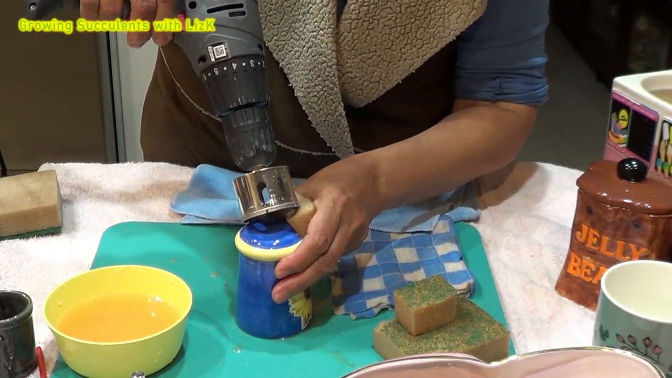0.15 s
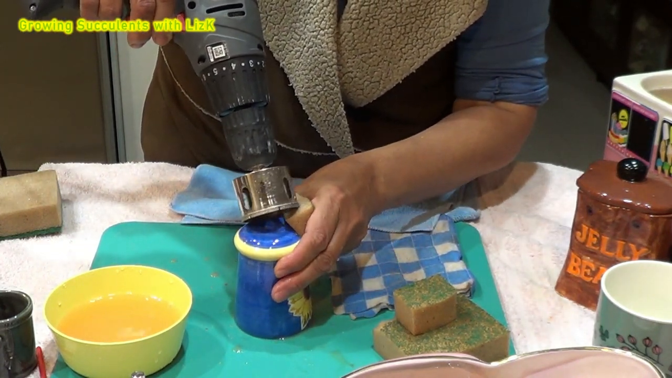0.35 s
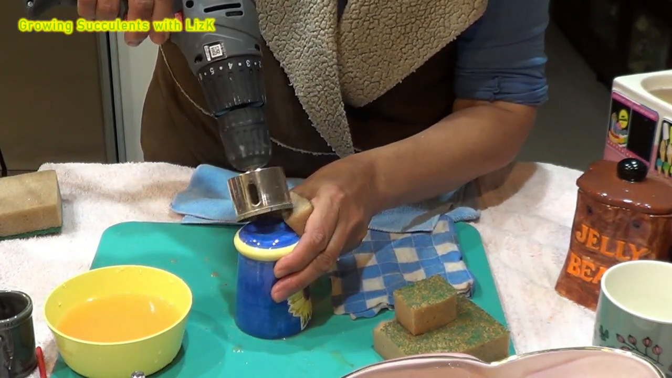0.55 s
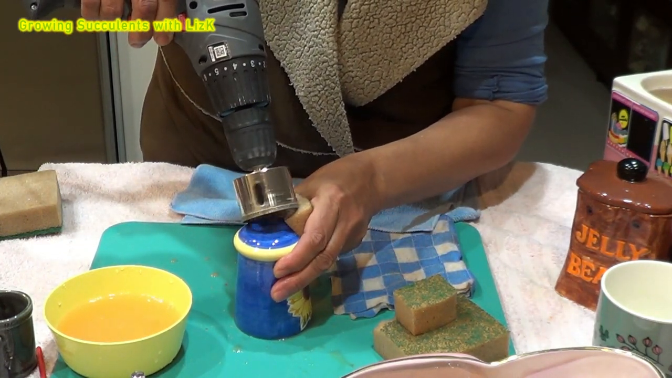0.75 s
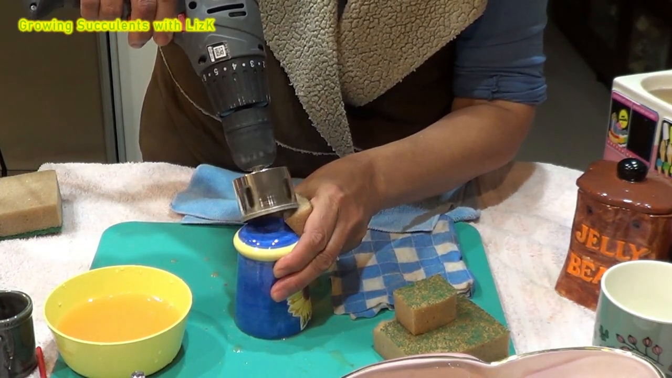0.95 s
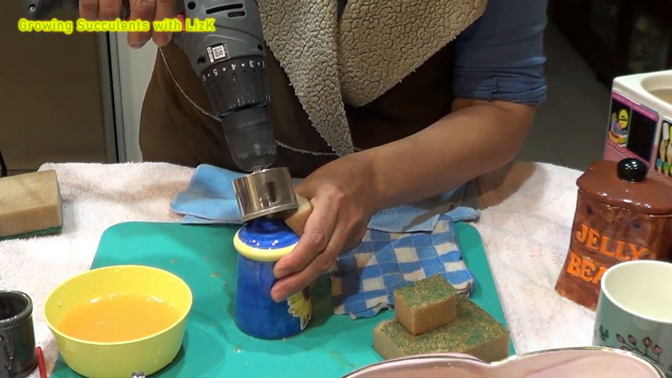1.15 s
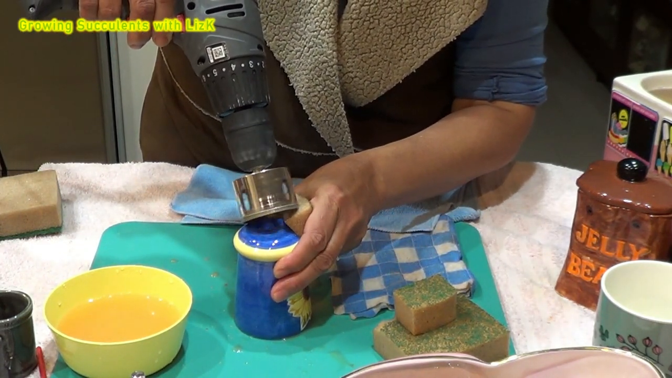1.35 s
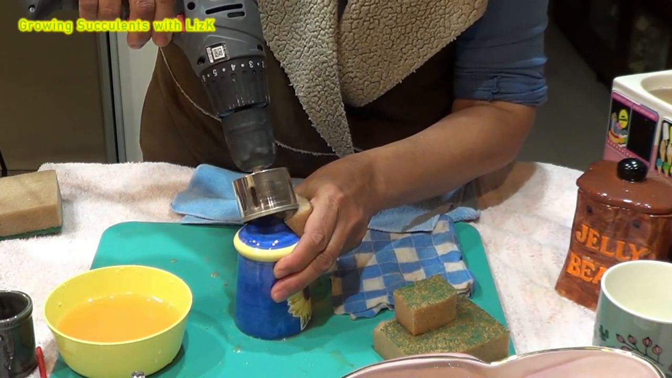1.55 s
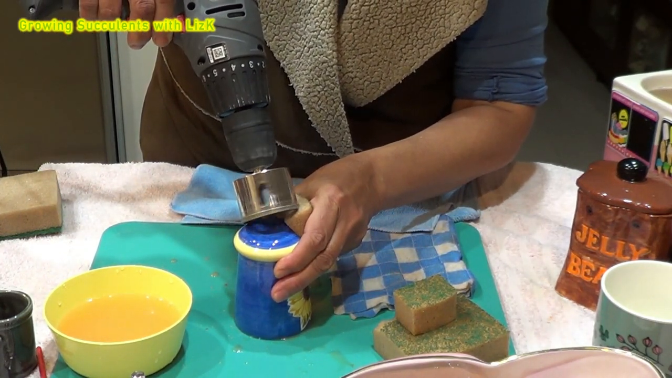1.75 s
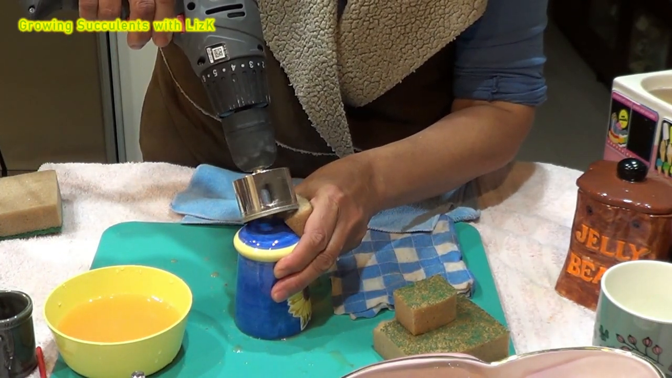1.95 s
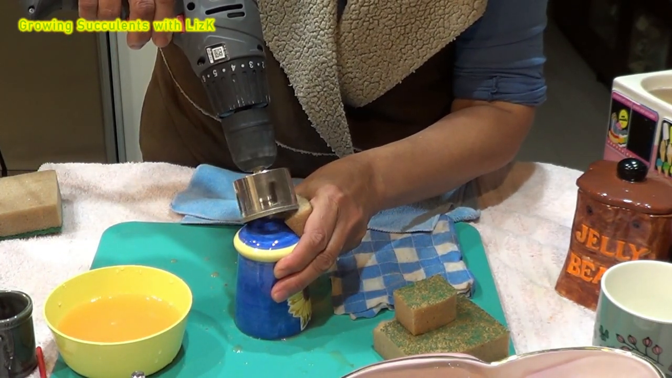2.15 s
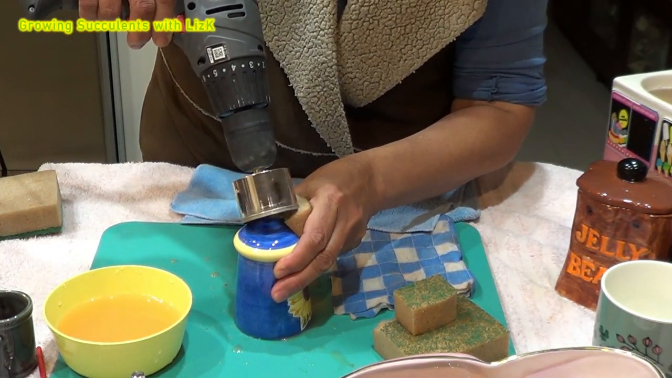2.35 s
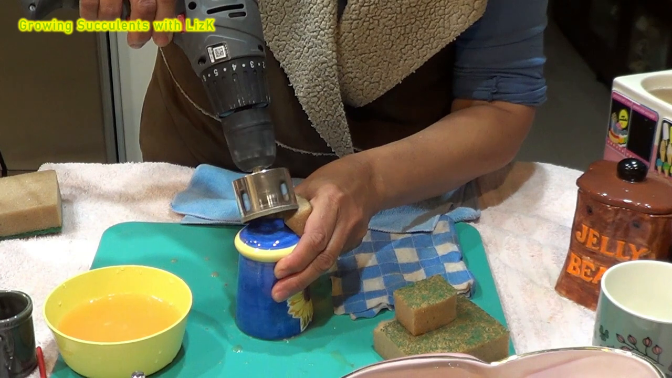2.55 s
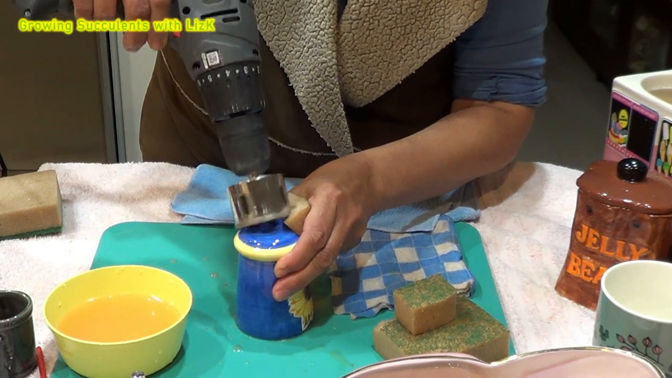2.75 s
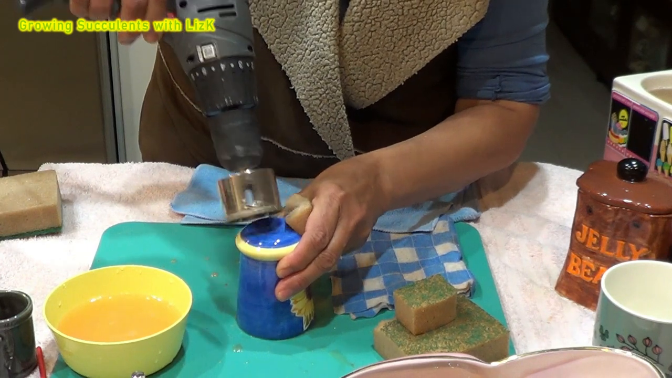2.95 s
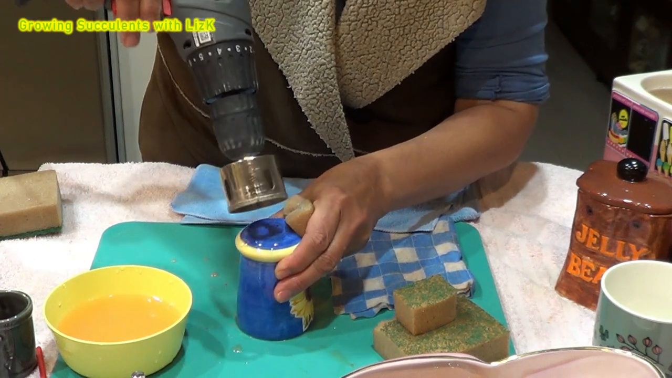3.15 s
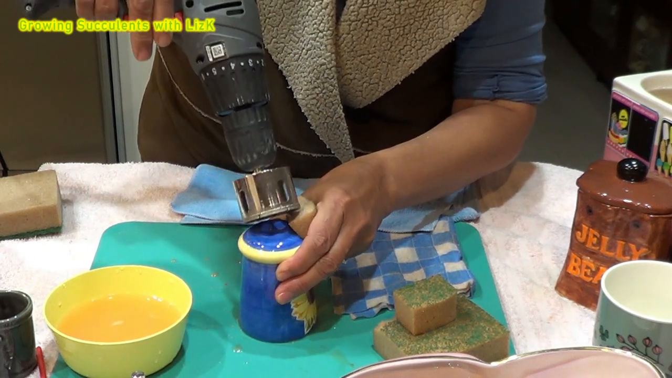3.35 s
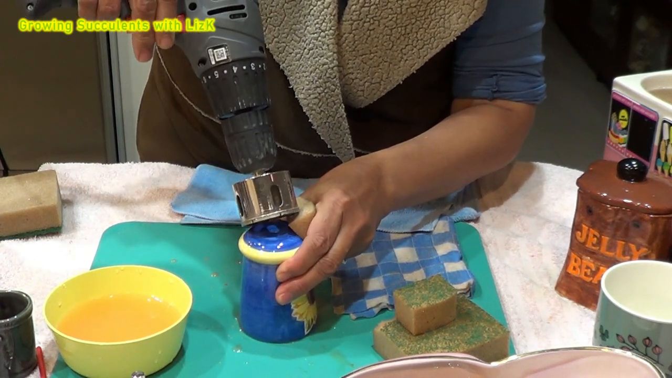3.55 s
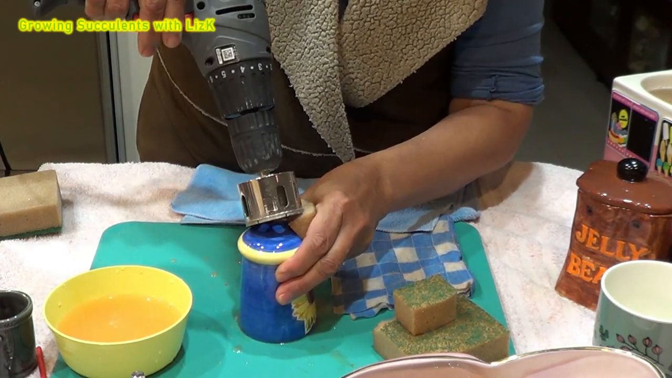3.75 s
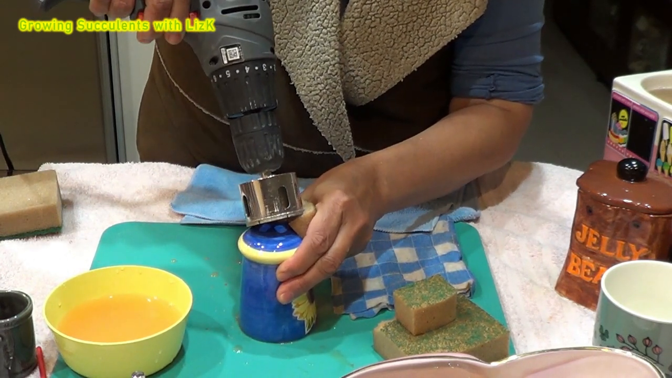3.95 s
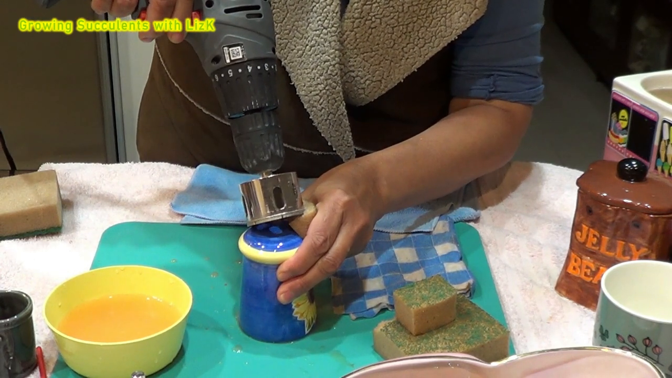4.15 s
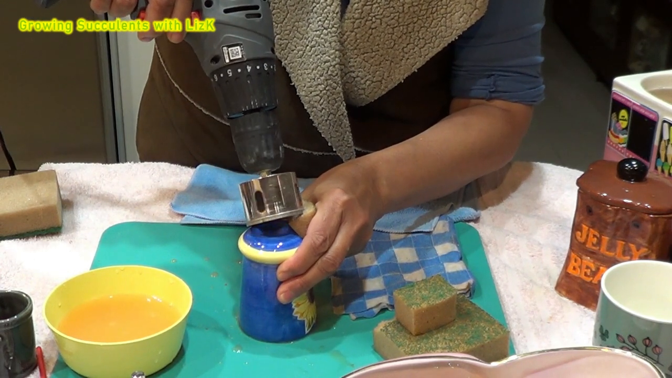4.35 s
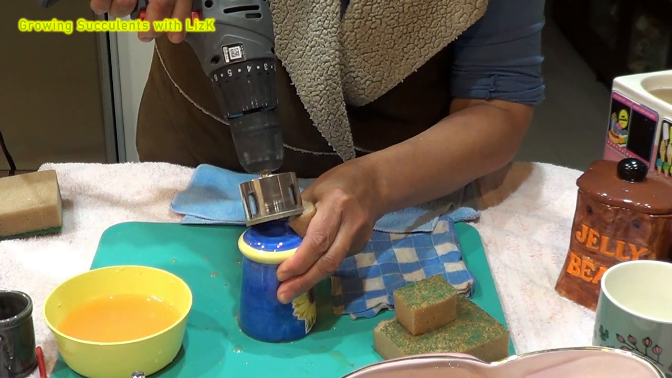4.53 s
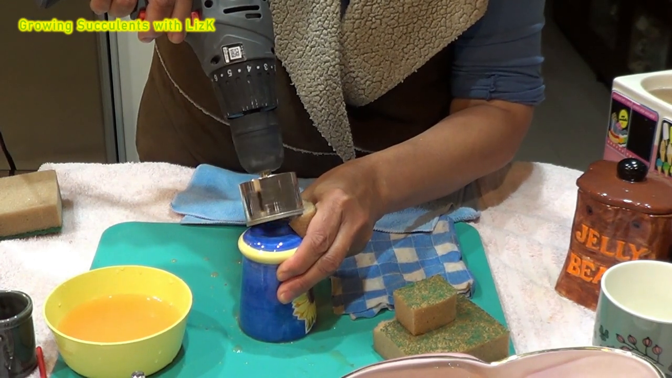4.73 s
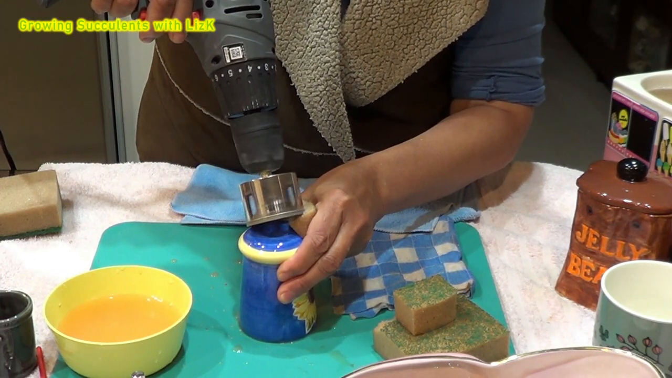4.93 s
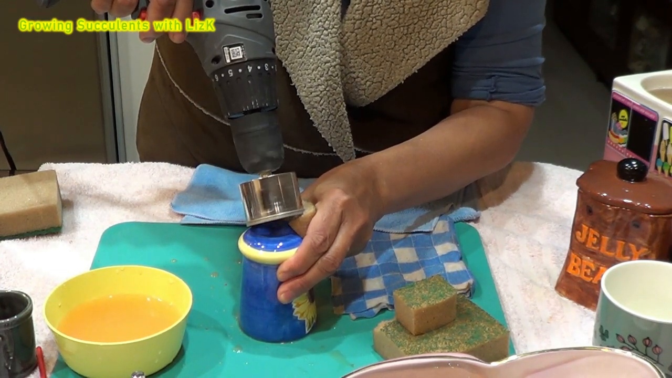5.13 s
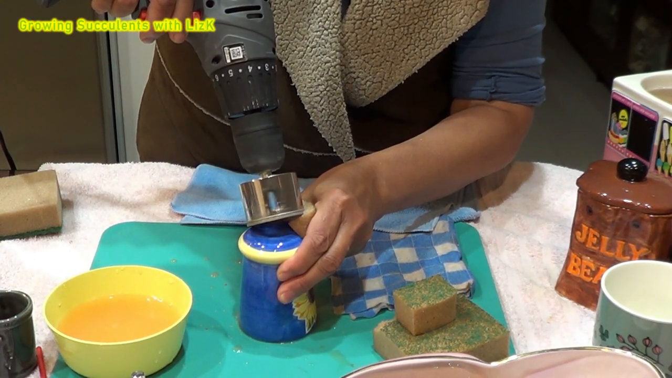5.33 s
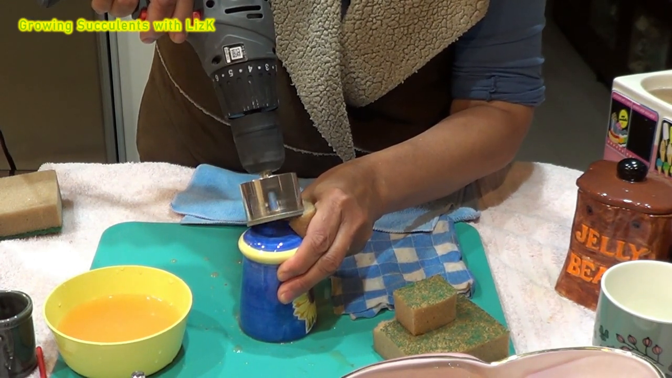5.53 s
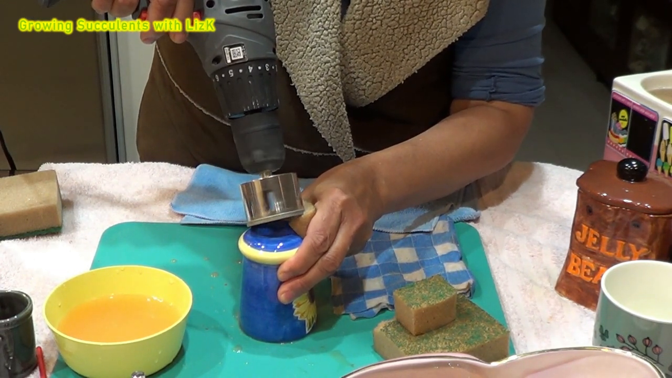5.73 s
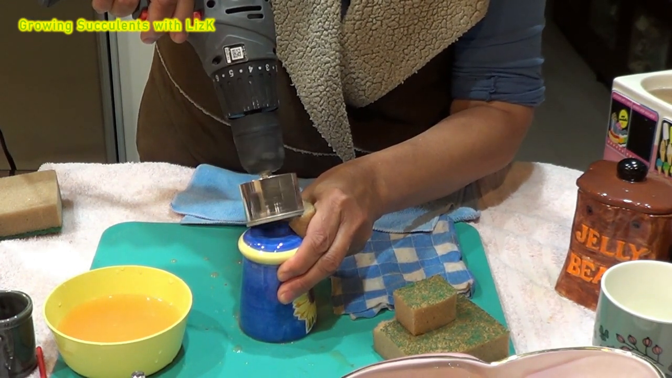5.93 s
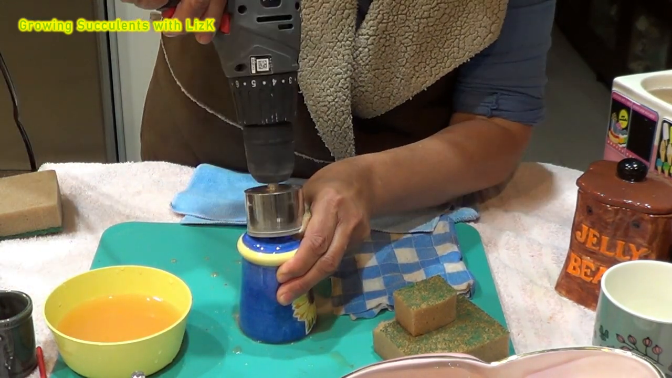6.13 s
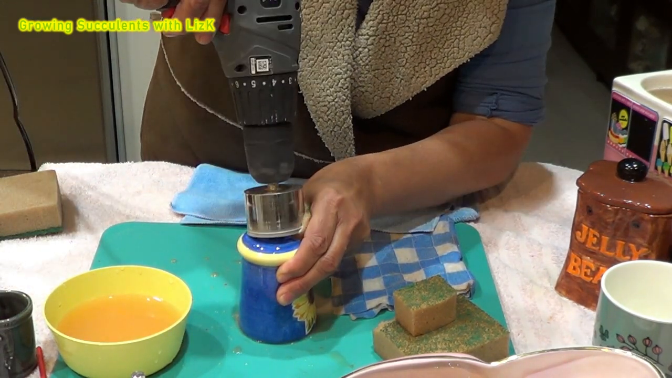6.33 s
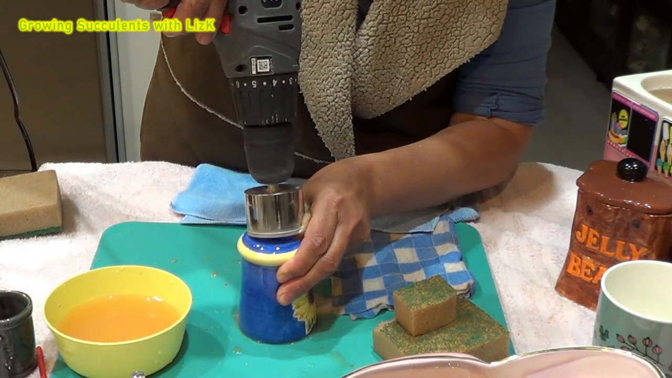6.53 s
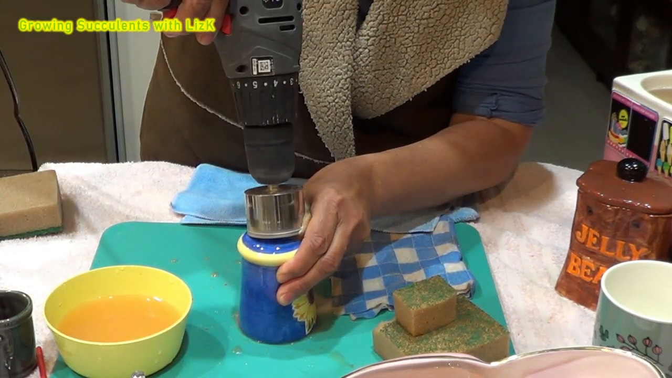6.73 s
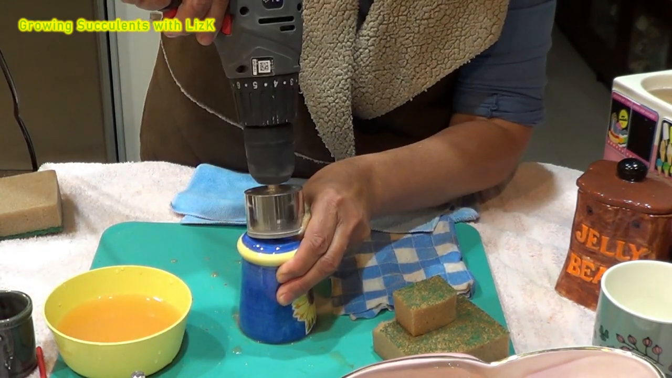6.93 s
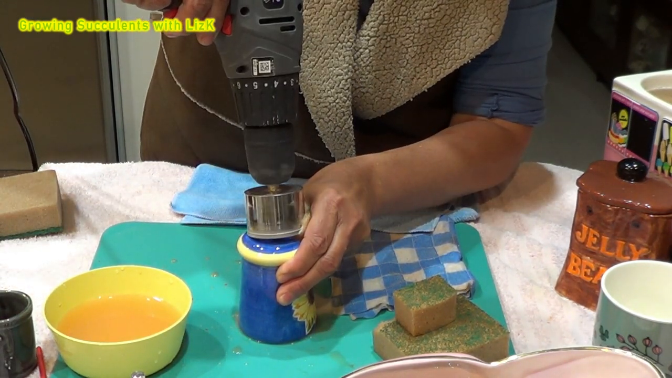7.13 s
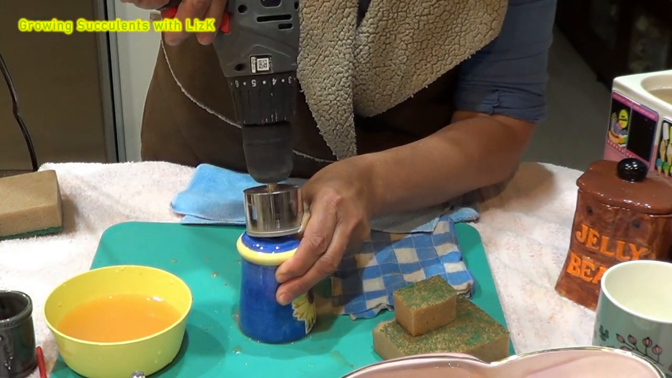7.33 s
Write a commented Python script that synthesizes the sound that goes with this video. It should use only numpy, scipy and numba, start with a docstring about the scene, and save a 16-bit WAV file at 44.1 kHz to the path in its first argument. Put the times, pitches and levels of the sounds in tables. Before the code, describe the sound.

A small room with a low steady noise floor and the microphone close. Small clicks and slow gear ticks at 0.1 to 0.3 seconds quicken into a rough drill whir, climbing to a medium whine by about 1 second. Gritty, uneven grinding rumbles in the hollow ceramic pot, strongest near 0.75, with steel ringing and hiss. The pitch holds, sags from about 2.3, dips near 2.8, briefly revives, then falls quickly from 3.1 to a stop by about 3.45. Dull knocks as the saw is set down come at 3.4 to 3.7. Light rattles and hesitant ticking from 3.8 to 4.2 lead into a rapid climb, reaching a high, bright whine around 5 seconds. Near 6 it drops slightly and becomes cleaner, pulsing gently over lighter grit, sagging a little just before the end at about 7.4, still running.

```python
"""In a small room, a cordless drill turns a diamond hole saw on a wet ceramic pot, close to the listener.
Gear teeth tap the housing, slowly at first and then as a whine: each tap excites damped resonances.
Random grains of grit rumble in the hollow pot, ring the steel saw and hiss.
The drill runs down, the saw is set back on the pot with a few knocks, and a faster run follows.
A diffuse tail and a steady noise floor surround it; the two channels differ slightly."""
import sys
import numpy as np
from scipy import signal
from scipy.fft import rfft, irfft, next_fast_len
from scipy.io import wavfile
from scipy.ndimage import uniform_filter1d
from numba import njit

SR = 44100
rng = np.random.default_rng(int(sys.argv[2]) if len(sys.argv) > 2 else 0)


def transcribe(u):
    """Save the signal u as a 16-bit wav file named by the first command-line argument.

    u: samples, shape (n,) or (channels, n), limited to [-1, 1]; the rate is SR.
    q: integer samples, one column per channel.
    """
    v = np.clip(np.atleast_2d(u).T, -1, 1)
    q = np.round(v * 32767).astype(np.int16)
    wavfile.write(sys.argv[1], SR, q)


N = 325590  # length in samples

# Steady background noise. Each row: frequency in Hz, relative spectral density in dB.
FLOOR_SPECTRUM = [(20, -22), (60, -24), (190, -9.5), (260, -12), (400, -9), (750, -2.5), (1500, -9.5),
                  (4000, -8.5), (8000, -19), (15500, -30)]
FLOOR_DB = -46.5  # RMS level
# Left-right balance. Each row: frequency in Hz, left minus right in dB.
BALANCE = [(100, 1), (600, .5), (2500, 1.6), (5000, 1.3), (9000, .2), (15000, 0)]
# Part unlike in the two channels. Each row: frequency in Hz, gain in dB before a common trim.
SIDE_SPECTRUM = [(30, -23), (120, -1), (300, -10), (700, -13), (1300, -17.5), (2400, -16.5), (4400, -5),
                 (6500, -8), (9000, -17), (13000, -54)]
ROOM_DB = -13  # gain of the diffuse tail
TOP_HZ = 15720  # upper band limit

# Resonances of the loose parts of the housing. Each row: frequency in Hz, width in Hz, relative gain in dB.
HOUSING_MODES = [(960, 226, -8.5), (1694, 556, -5), (2577, 665, -0.5), (3420, 620, -1), (4156, 890, -2.5),
                 (5390, 530, -3), (6380, 1450, -11.5), (6940, 270, -9), (8430, 2500, -13),
                 (11100, 7600, -19)]
# Resonances of the hollow pot. Each row: frequency in Hz, width in Hz, relative gain in dB.
POT_MODES = [(266, 45, -22.5), (414.8, 16.5, 0.5), (536, 77, 1), (650, 93, 1.5), (731, 50, 5),
             (1000, 520, -7)]
# Resonances of the glazed rim of the pot. Each row: frequency in Hz, width in Hz, relative gain in dB.
RIM_MODES = [(2450, 50, 2), (4450, 300, -1)]
# Resonances of the steel saw. Each row: frequency in Hz, width in Hz, relative gain in dB.
SAW_MODES = [(6800, 300, -4), (7250, 200, -3), (8120, 250, -9), (10250, 150, 1), (12200, 80, -10),
             (12800, 90, -8), (13250, 70, -9), (13500, 60, -9), (14100, 170, -12)]
# Resonances of the gearbox. Each row: frequency in Hz, width in Hz, relative gain in dB.
GEARBOX_MODES = [(1296, 135, 1), (1582, 268, 6.5), (1882, 133, 6.5), (2058, 111, 7), (2261, 580, 7),
                 (2760, 480, 5.5), (3046, 73, 4), (3564, 284, 2), (4480, 560, -8), (4350, 82, 2),
                 (5156, 330, -5), (6020, 170, -5), (7120, 860, -14.5)]
# Table shaking under the pot. Each row: frequency in Hz, relative spectral density in dB.
TABLE_SHAKE = [(20, -32), (120, -33.5), (200, -25), (330, -13.5), (420, -30), (800, -90)]

# Short clicks of housing and steel: some loose rattles, some accenting the first slow gear ticks.
# Each row: time in seconds, relative housing blow in dB, relative steel blow in dB.
CLICK_BLOWS = [(0.0147, -23, -38), (.137, -26, -24.5), (0.163, -22, -20), (0.212, -22, -18),
               (0.286, -23, -16), (0.517, -27, -16.5), (.705, -10, -26), (3.574, -21, -29.5),
               (3.824, -41, -36), (3.85, -28, -36), (3.914, -16, -39), (3.954, -18.5, -31),
               (3.98, -33, -36), (4.036, -21, -33), (4.064, -20, -24), (4.097, -14.5, -33),
               (4.123, -15, -24)]
CLICK_POT_DB, CLICK_RIM_DB = -27, -32  # relative to the housing blow
# Saw set down on the pot. Each row: time in seconds, relative thump in dB, relative hard edge in dB.
SET_DOWN_BLOWS = [(3.393, -21.5, -46), (3.585, -34, -32), (3.601, -23, -27), (3.622, -22.5, -44),
                  (3.676, -34, -54)]
# Blows relative to the hard edge. One row: housing in dB, steel in dB, rim in dB.
EDGE_OFFSETS = (10, -6, -2)

# Pull of the motor, one list per stretch of running. Each row: time in seconds,
# tooth rate in Hz that the motor pulls towards (below zero it brakes).
MOTOR_PULL = [
    [(.085, 700), (.105, 206), (.22, 437), (.833, 633), (1.493, 687), (2.1, 643), (2.33, 618), (2.5, 530),
     (2.739, 515), (2.798, 167), (2.833, 632), (2.957, 690), (3.077, 530), (3.126, -429), (3.45, -585)],
    [(3.965, 130), (4.07, 300), (4.14, 140), (4.189, 235), (4.352, 1088), (5.2, 1139), (5.81, 1144),
     (5.98, 1087)],
    [(5.981, 990), (6.25, 1030), (6.6, 1040), (6.95, 985), (7.2, 1015), (7.26, 1000), (7.3, 760),
     (7.38, 760)],
]
# Speed as each stretch begins. One row: tooth rate in Hz per stretch.
START_RATES = [40, 33, 995]
INERTIA_S = .53  # time constant of the tooth rate

# Swell once a saw turn. One row: depth (0-1) per stretch.
SAW_WOBBLE = [0, .2, .6]
TEETH, TEETH_A_SAW_TURN = 15, 272  # teeth passing per turn of pinion and of saw
# Pinion position as each stretch begins. One row: turns per stretch.
PINION_START = [.28, .12, 0]
PINION_SWELL = 0.23  # swell once a pinion turn (0-1)
LABOUR_SWELL, LABOUR_HZ = 0.15, 350  # added swell when pulling, deepest near this tooth rate
TAP_JITTER, JITTER_HZ = .006, 600  # share of a tooth period at this rate; slower teeth stray more

# Base levels before speed and weight act. Each row, one per stretch: gears in dB, pot rumble in dB, saw ring in dB.
STRETCH_LEVELS = [(-12, -22.5, -17.5), (-12, -23, -20), (-10.5, -26.5, -23)]
# Loss at low speed, for gears, pot and saw. Each row: knee in Hz, loss in dB per halving of rate far below it.
SPEED_KNEES = [(239, 11), (183, 11.5), (730, 7.5)]
# Weight of the saw on the pot. Each row: time in seconds, weight in dB.
WEIGHT = [(.2, -1), (.35, 0), (.75, 3.5), (1.5, -0.5), (2.6, 0), (2.85, -4.5), (3.12, -55.5), (3.45, 14.5),
          (3.95, 4), (4.5, 1.5), (4.7, -2), (7.38, -3)]
GEAR_SHARE, SAW_SHARE = 0.12, 0.01  # share of the weight's dB that gears and saw follow
# Base of clean taps over rattle. One row: ratio in dB per stretch, before speed, effort and weight act.
CLEAN_BASE = [.5, 1.5, 5]
# Taps are cleanest under a light load. Each row: weight in dB, added clean-to-rattle ratio in dB.
CLEAN_FOR_WEIGHT = [(-25, -5), (-3, 1), (3, -3.5)]
SLOW_CLEAN_DB, SLOW_HZ = 3.5, 130  # lone slow taps stand clear of the rattle
EFFORT_CLEAN_DB, EFFORT_GEAR_DB = 6, 2.5  # per 1000 Hz of pull above the tooth rate
BRAKE_GEAR_DB = 2  # per 1000 Hz of pull below the tooth rate
FADE_S = .04  # averaging time of the levels at start and stop


def undb(db):
    """Decibel law: amplitude ratio of a level."""
    return 10 ** (np.asarray(db) / 20)


def level(x, db):
    """Root-mean-square law: scale a signal to an RMS level in dB."""
    return x * undb(db) / np.sqrt(np.mean(x ** 2))


@njit
def svf(x, hz, width):
    """Damped resonance: a state-variable band-pass with gain 1 at the centre."""
    y, band, low = np.empty(len(x)), 0., 0.
    g, damping = np.tan(np.pi * hz / SR), width / hz
    for i in range(len(x)):
        v = (band + g * (x[i] - low)) / (1 + g * (g + damping))
        band = 2 * v - band
        low += 2 * g * v
        y[i] = damping * v
    return y


def ring(x, modes):
    """Modal superposition: a body is a sum of resonances, here with alternating signs."""
    out = 0
    for k, (hz, width, db) in enumerate(modes):
        # the tiny offset keeps silence away from denormal numbers
        out = out + (-1) ** k * undb(db) * svf(x + 1e-18, 1. * hz, 1. * width)
    return out


def colour(x, table):
    """Linear filtering: gain in dB interpolated over log frequency."""
    hz, db = np.transpose(table)
    size = next_fast_len(N)
    log_hz = np.log(np.fft.rfftfreq(size, 1 / SR) + 1)
    gain = undb(np.interp(log_hz, np.log(hz + 1), db))
    return irfft(rfft(x, size) * gain, size)[:N]


def walk(rate):
    """Random modulation: levels held 1 / rate seconds and slewed twice, with a spread near 1."""
    hold = int(SR / rate)
    steps = np.repeat(rng.standard_normal(N // hold + 1), hold)
    return 1.3 * uniform_filter1d(uniform_filter1d(steps, hold), hold)[:N]


def taps(at, size):
    """Impulsive excitation: clicks at fractional sample places, shared between neighbours."""
    out, i = np.zeros(N + 2), np.clip(at, 0, N).astype(int)
    np.add.at(out, i, size * (1 - at + i))
    np.add.at(out, i + 1, size * (at - i))
    return out[:N]


def grit(share, spread_db):
    """Random impulses: grains crack by chance, a few far larger than the rest."""
    chance, rarity = rng.random((2, N))
    sign = np.sign(chance * 1e6 % 1 - .5)
    return np.where(chance < share, sign * undb(-spread_db * np.log(rarity + .002)), 0)


def background():
    """Stationary noise: a steady floor with a fixed spectrum."""
    return level(colour(rng.standard_normal(N), FLOOR_SPECTRUM), FLOOR_DB)


def room(x, t60_s):
    """Diffuse decay: convolution with fading noise whose treble dies in half the time."""
    t = np.arange(SR // 2) / SR
    noise = rng.standard_normal(len(t))
    dull = svf(noise, 650., 1500.)
    tail = dull * undb(-60 * t / t60_s)
    tail += (noise - dull) * undb(-60 * t / (t60_s / 2))
    return signal.fftconvolve(x, level(tail, 0) / np.sqrt(len(t)))[:N]


def knocks():
    """Impact excitation: each click or knock is a short rough push that rings housing, pot, saw and rim."""
    click_s, housing, steel = np.transpose(CLICK_BLOWS)
    down_s, thump, edge = np.transpose(SET_DOWN_BLOWS)
    click_db = [housing, housing + CLICK_POT_DB, steel, housing + CLICK_RIM_DB]
    down_db = [edge + EDGE_OFFSETS[0], thump, edge + EDGE_OFFSETS[1], edge + EDGE_OFFSETS[2]]
    blows_db = np.hstack([click_db, down_db])
    at, out = np.r_[click_s, down_s] * SR, 0
    # modes, gain in dB, decay of the push in seconds, steady part of the push
    bodies = [(HOUSING_MODES, 3.3, 0.0049, 0), (POT_MODES, 24.4, 0.0025, 1),
              (SAW_MODES, 21.6, 0.0016, 0), (RIM_MODES, 26.0, 0.0047, 0)]
    for db, (modes, gain_db, contact_s, push) in zip(blows_db, bodies):
        fade = np.exp(-np.arange(900) / (contact_s * SR))
        blow = np.convolve(taps(at, undb(db)), fade)[:N] * (push + rng.standard_normal(N))
        out = out + undb(gain_db) * ring(blow, modes)
    return out


def pot():
    """Cavity resonance: grit thumps the hollow pot in uneven bursts; the table shakes a little."""
    thumps = grit(0.016, 2.07) * undb(1.75 * walk(45))
    rumble = svf(ring(thumps, POT_MODES), 477.0, 860.0)
    shake = colour(rng.standard_normal(N), TABLE_SHAKE)
    return level(rumble, 0) + level(shake, -23.5)


def saw():
    """Shell vibration: sharp grains ring the steel cup and hiss; its highest modes speak in own bursts."""
    grains = grit(.05, 3.2) * undb(2.3 * walk(14))
    bursts = grains * undb(4.5 * walk(9))
    hiss = svf(grit(0.18, 3.6) * undb(1.4 * walk(10)), 6930.0, 4800.0)
    steel = ring(grains, SAW_MODES[:4]) + ring(level(bursts, 0) * grains.std(), SAW_MODES[4:])
    return level(steel, -2) + level(hiss, -4)


def motor():
    """Rotational inertia: the tooth rate lags the pull; returns rate, pull and samples of each stretch."""
    t, spans = np.arange(N) / SR, []
    hz, pull = np.full(N, 30.), np.full(N, 30.)
    keep = np.exp(-1 / (INERTIA_S * SR))
    for run, start_hz in zip(MOTOR_PULL, START_RATES):
        s, target_hz = np.transpose(run)
        on = np.flatnonzero((t >= s[0]) & (t <= s[-1]))
        pull[on] = np.interp(t[on], s, target_hz)
        hz[on] = signal.lfilter([1 - keep], [1, -keep], pull[on], zi=[keep * start_hz])[0]
        spans.append(on)
    return hz, pull, spans


def levels(hz, pull, spans):
    """Load dependence: gains and clean-to-rattle ratio follow speed, effort, braking and weight on the pot."""
    db, running = np.zeros((4, N)), np.zeros(N)
    for on, row, clean in zip(spans, STRETCH_LEVELS, CLEAN_BASE):
        db[:, on] = np.r_[row, clean][:, None]
        running[on] = 1
    brake, effort = np.clip([hz - pull, pull - hz], 0, None) / 1000
    weight_db = np.interp(np.arange(N) / SR, *np.transpose(WEIGHT))
    for k, ((knee_hz, halving_db), share) in enumerate(zip(SPEED_KNEES, (GEAR_SHARE, 1, SAW_SHARE))):
        db[k] += share * weight_db - halving_db * np.log2(1 + (knee_hz / hz) ** 2) / 2
    db[0] += BRAKE_GEAR_DB * brake + EFFORT_GEAR_DB * effort
    clean_db = db[3] + SLOW_CLEAN_DB / (1 + (hz / SLOW_HZ) ** 2) + EFFORT_CLEAN_DB * effort
    clean_db += np.interp(weight_db, *np.transpose(CLEAN_FOR_WEIGHT))
    gains = uniform_filter1d(undb(db[:3]) * running, int(FADE_S * SR), mode="nearest")
    return gains, clean_db


def gears(hz, pull, spans, clean_db):
    """Gear meshing: one tap per tooth, swelled and shifted by an off-centre pinion; loose play rattles after."""
    places, turns, swell = [], [], np.ones(N)
    for on, depth, start in zip(spans, SAW_WOBBLE, PINION_START):
        teeth = np.cumsum(hz[on]) / SR
        k = np.arange(int(teeth[-1]) + 1)
        places.append(np.interp(k - .035 * np.sin(2 * np.pi * k / TEETH), teeth, on))
        turns.append(k / TEETH + start)
        swell[on] = 1 + depth * np.cos(2 * np.pi * (teeth / TEETH_A_SAW_TURN - .25))
    at = np.concatenate(places)
    turn = 2 * np.pi * np.concatenate(turns)
    size_chance, time_chance = rng.standard_normal((2, len(at)))
    rate = hz[at.astype(int)]
    labour = np.exp(-2 * np.log(rate / LABOUR_HZ) ** 2) * (pull[at.astype(int)] > rate)
    depth = np.clip(PINION_SWELL + LABOUR_SWELL * labour, 0, 1)
    size = (1 + depth * np.cos(turn)) * undb(2.74 * size_chance)
    stray = TAP_JITTER * (JITTER_HZ / rate) ** .75 * SR / rate * time_chance
    pulses = taps(at + stray, size) / np.sqrt(hz / 600)
    # noise that decays after each tap, over noise that grows with speed
    after = signal.lfilter([1], [1, -np.exp(-1 / (0.0065 * SR))], np.abs(pulses))
    rattle = level(after, 0) * rng.standard_normal(N) + np.sqrt(hz / 900) * rng.standard_normal(N)
    # the leaning saw loads the low gearbox modes once a turn
    fast = hz / (hz + 150)
    low = fast * swell * ring(pulses, GEARBOX_MODES[:4]) * undb(2.0 * fast * walk(25))
    middle = ring(pulses, GEARBOX_MODES[4:8]) * undb(2.5 * fast * walk(22))
    # faster teeth meet harder and reach the high modes
    high = hz / 700 * ring(pulses, GEARBOX_MODES[8:]) * undb(1.63 * walk(14))
    clean = level(low + middle + high, 0)
    rough = level(ring(rattle, HOUSING_MODES), 0) * undb(1.04 * walk(40))
    power_ratio = undb(clean_db) ** 2
    return (np.sqrt(power_ratio) * clean + rough) / np.sqrt(1 + power_ratio)


def scene():
    """Superposition: sources, diffuse tail and floor add up in two slightly unlike channels."""
    hz, pull, spans = motor()
    (gear_gain, pot_gain, saw_gain), clean_db = levels(hz, pull, spans)
    hits = knocks()
    near = hits + pot_gain * pot() + saw_gain * saw()
    near += gear_gain * gears(hz, pull, spans, clean_db)
    # knocks also travel into the table top, which rings on
    echo = undb(ROOM_DB) * room(near + undb(1) * hits, t60_s=0.6)
    mid = near + echo + background()
    # what differs between the channels flutters quickly; the drill stands left of centre
    side = undb(-1.5) * colour(walk(100) * room(mid, t60_s=0.068), SIDE_SPECTRUM)
    tilt = np.array(BALANCE) * [1, .5]  # half the difference goes to each channel
    left = colour(mid, tilt) + side
    right = colour(mid, tilt * [1, -1]) - side
    return np.array([left, right])


def record(dry):
    """Saturation and band limiting: loud peaks are rounded and clipped at twice the rate, the top is cut."""
    double = signal.resample_poly(dry, 2, 1, axis=1)
    soft = np.clip(np.tanh(.7 * double) / .7, -.94, .94)
    top = signal.ellip(12, .2, 85, TOP_HZ, fs=SR, output="sos")
    return np.clip(signal.sosfilt(top, signal.resample_poly(soft, 1, 2, axis=1)), -1, 1)


dry = scene()
out = record(dry)
transcribe(out)
```